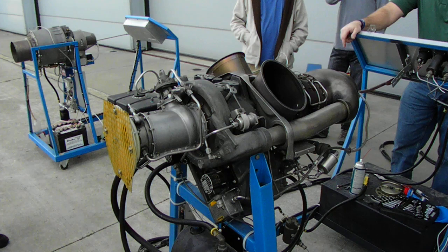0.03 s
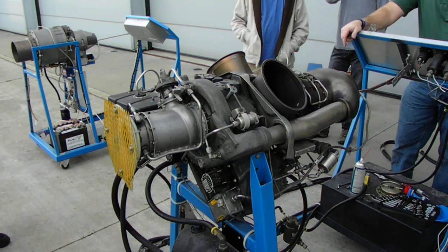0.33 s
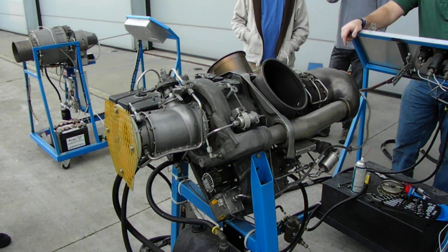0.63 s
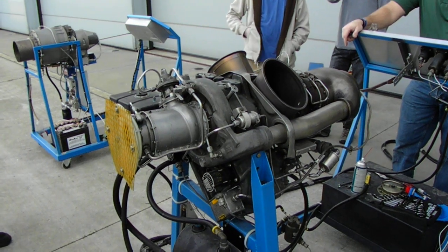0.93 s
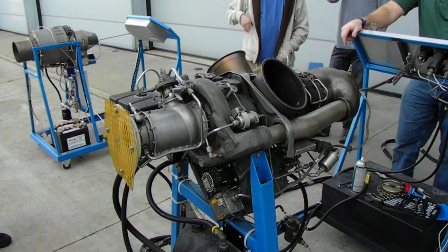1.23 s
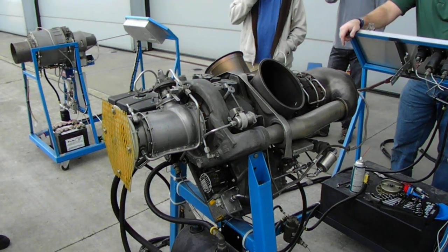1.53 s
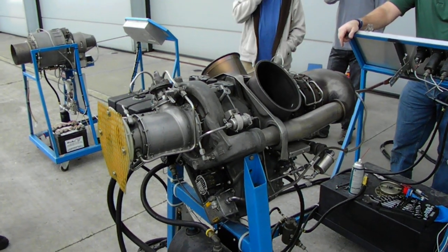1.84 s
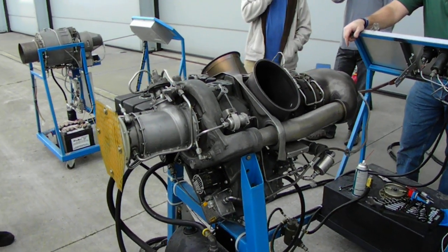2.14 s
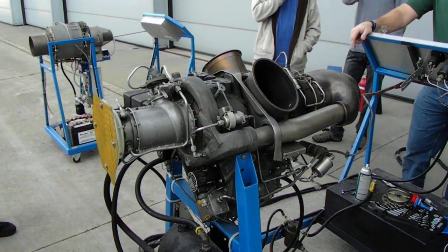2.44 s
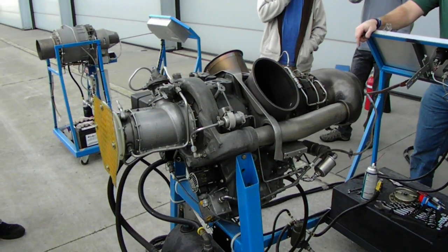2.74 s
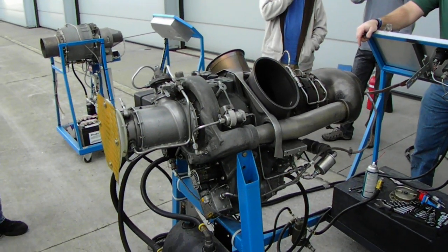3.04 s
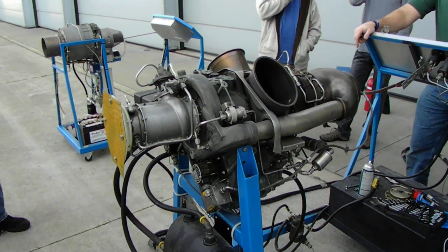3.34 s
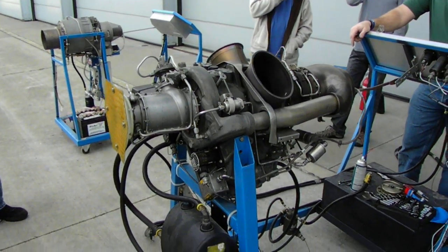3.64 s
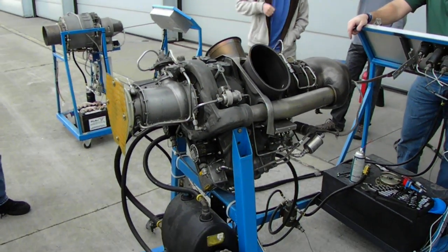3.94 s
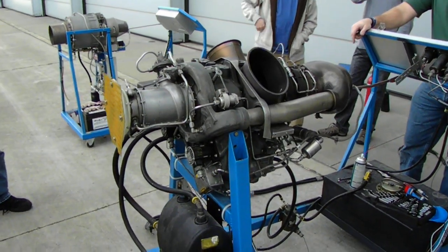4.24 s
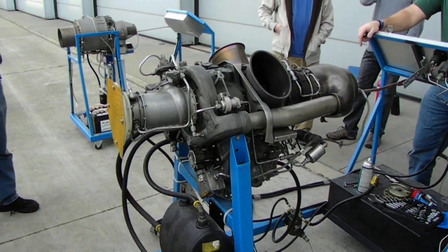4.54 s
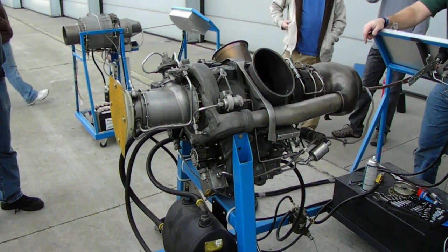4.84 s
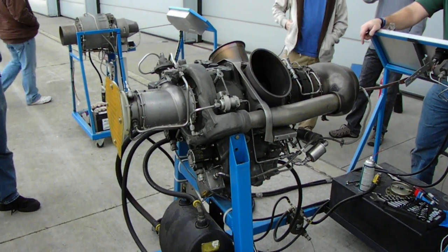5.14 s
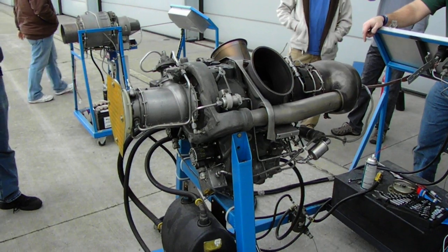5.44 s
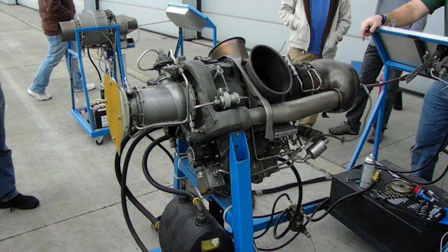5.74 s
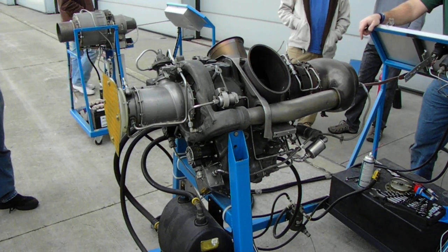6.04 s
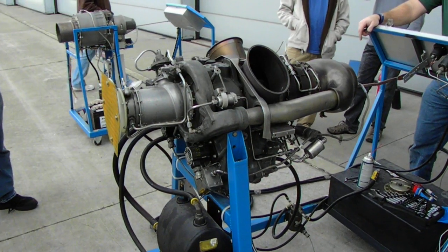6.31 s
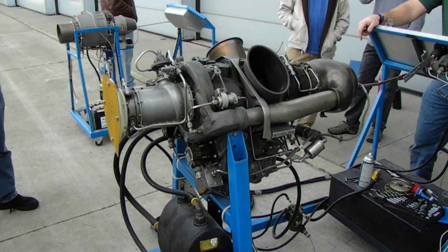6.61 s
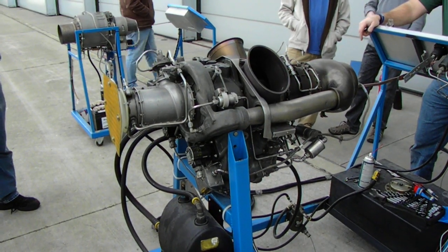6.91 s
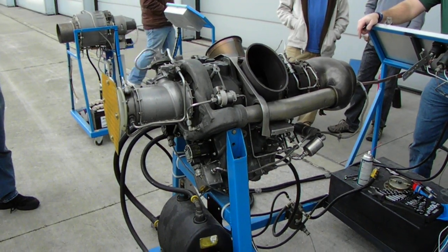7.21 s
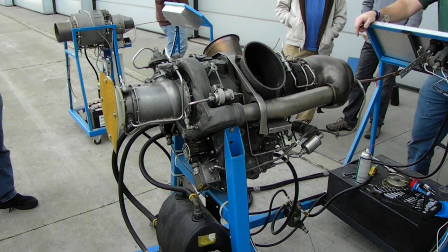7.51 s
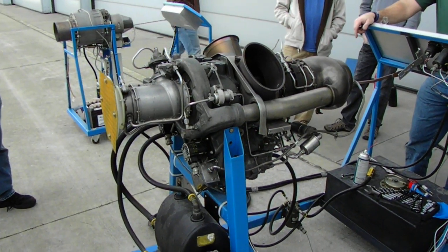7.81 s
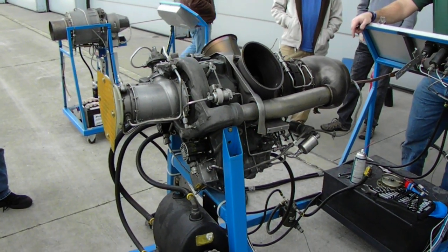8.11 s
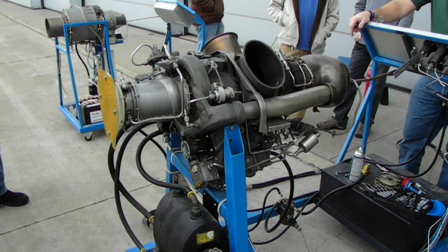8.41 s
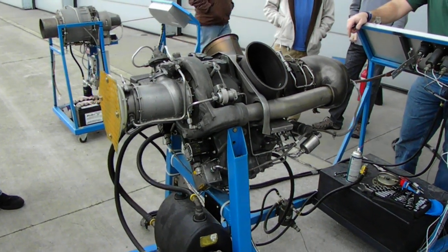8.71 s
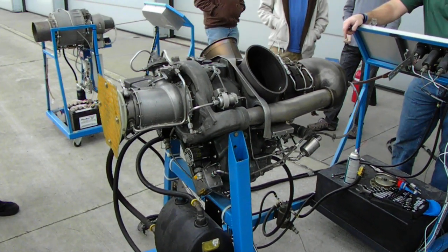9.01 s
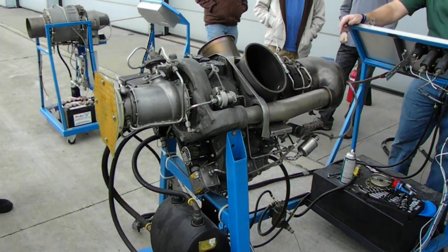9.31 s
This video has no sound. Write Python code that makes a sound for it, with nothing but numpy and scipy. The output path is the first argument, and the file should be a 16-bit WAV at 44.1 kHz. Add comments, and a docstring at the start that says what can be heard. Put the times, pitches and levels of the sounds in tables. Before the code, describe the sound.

Heard from close by in a large hall, a turbine engine on a test stand gives a shrill, steady whine over a strong hiss of air and a duller roar. Singing gears and a faint pump tone blend in, and the high tones shimmer as the microphone shifts. In the last second the power is cut: the gear tones weaken and the whine begins to sink in pitch, while the hiss continues.

```python
"""A small gas turbine on a test stand in a large hall, close to a hand-held microphone.
Its blades chop the air and whine on multiples of the rotor speed. A reduction gear sings and a pump
hums over intake hiss and exhaust roar. Near the end the fuel is cut: the pump's hum drops out,
the gears unload and all shaft tones glide down as drag slows the rotor."""
import sys
import numpy as np
from scipy import signal
from scipy.fft import rfft, irfft, next_fast_len
from scipy.io import wavfile

SR = 44100
rng = np.random.default_rng(int(sys.argv[2]) if len(sys.argv) > 2 else 0)


def materialize(psi):
    """Save the field psi as 16-bit PCM at rate SR to the path in sys.argv[1].

    A 1-D psi becomes a single channel; in a 2-D psi each row is a channel.
    """
    bounded = np.clip(np.atleast_2d(psi).T, -1, 1)
    quanta = np.round(bounded * 32767).astype(np.int16)
    wavfile.write(sys.argv[1], SR, quanta)


N = 412776

# governed rotor speed: time_s, speed_hz
GOVERNED_SPEED = [(0.1, 688.64), (0.8, 691.11), (1.39, 692.57), (1.99, 693.52), (2.74, 694.15),
                  (4.73, 694.67), (6.02, 694.55), (8.51, 693.27)]
# main blade tones as the microphone moves through standing waves: time_s, order_7_db, order_8_db
BLADE_LEVELS = [(0.12, -21, -23.2), (1.11, -22.5, -22.5), (1.36, -25.5, -20.5), (1.91, -26.7, -20.6),
                (2.4, -20, -24.5), (2.6, -22.9, -20.2), (2.85, -24.8, -24.8), (3.69, -23.4, -21.8),
                (4.14, -20.3, -27.5), (4.29, -21.4, -25.8), (4.73, -20, -27), (4.98, -20.6, -20.8),
                (5.82, -24.5, -23.6), (6.57, -24, -22.7), (6.76, -22.3, -22.9), (8.1, -21.5, -24.5),
                (8.35, -20.5, -33.8), (8.5, -20.6, -29.1)]
# the same tones, beating faster as they glide: time_s, order_7_db, order_8_db
BLADE_COAST_LEVELS = [(8.56, -21, -23.2), (8.62, -26, -28.8), (8.68, -23.7, -21.3), (8.92, -23.5, -32),
                      (9.0, -20.5, -26.3), (9.07, -26.5, -41), (9.1, -25.5, -29), (9.21, -20, -26.9),
                      (9.29, -27.5, -35.9), (9.35, -29, -42)]
# upper whine, relative levels: time_s, order_12_db, order_15_db
WHINE_LEVELS = [(0.12, -35.5, -29.5), (2.3, -28, -29), (2.5, -44, -26), (2.65, -33.0, -34),
                (2.85, -29.0, -28), (3.29, -27, -28.5), (3.99, -46, -28), (4.19, -40, -33.8),
                (4.33, -32.8, -26.5), (4.53, -39, -34), (5.38, -36.2, -29), (5.87, -28, -33),
                (6.57, -34.8, -30.3), (7.51, -38, -34), (8.35, -29.5, -34.5), (8.5, -33, -30)]
# rotor orders 16 and 19, relative level: time_s, level_db
SHRILL_LEVELS = [(0.12, -36), (6.57, -47.5), (7.46, -38.5), (7.9, -39), (8.5, -39)]
# weak rotor tones: order, powered_db, coasting_db
WEAK_ROTOR_TONES = [(5,-48,-48), (6,-44.5,-49), (9,-44.5,-44), (10,-40.5,-39), (11,-48,-51), (13,-46.5,-52),
                    (17,-50.5,-52), (18,-47,-48), (20,-47,-47), (22,-53,-55), (24,-48,-42), (25,-56,-49)]
# resonant bands added to the upper whine: centre_hz, width_hz, gain_db
RESONANCES = [(7330, 120, 12.5), (9250, 220, -3.5), (10050, 190, -2.5)]
# tooth meshes: time_s, order_16_db, order_17_db
MESH_LEVELS = [(0.12, -41.7, -33.5), (0.47, -44, -37.5), (1.11, -36, -33), (3.29, -35.5, -34.5),
               (3.73, -31, -41), (4.13, -30, -34), (5.66, -33.7, -31.0), (6.06, -32.5, -34),
               (7.74, -37.5, -35.5), (8.48, -35.5, -33.1)]
# other gear shaft tones: order, base_db
GEAR_TONES = [(2,-71), (4.22,-51), (6,-53.5), (6.92,-50.5), (9,-60), (11.06,-55), (15,-56), (18,-47.5),
              (19,-49), (22,-51), (25,-38.5), (26,-49.5), (29,-50), (30,-46), (31,-46), (34,-44), (35,-48),
              (38,-48), (39,-47), (41,-49), (47,-45), (49,-39), (50,-36), (51,-43), (55,-48), (59,-48),
              (66,-49), (75,-48), (78,-51), (85,-54)]
# swell of high gear tones and pump overtones: time_s, gain_db
SINGING_GAIN = [(0.2, -3), (2.1, -5), (2.6, 1.5), (3.8, 1.5), (4.8, 0), (6.2, 2), (7.7, -1), (8.45, -2.5)]
# pump overtones: harmonic, base_db
PUMP_OVERTONES = [(2,-49), (3,-39), (4,-44), (6,-36), (7,-44.5)]
# airflow, relative levels: time_s, roar_db, hiss_db
FLOW_LEVELS = [(0.1, -44, -31), (1.5, -43, -29), (2.3, -43.2, -29.5), (4.8, -41.5, -28.5),
               (7.9, -42.5, -29), (8.9, -42.1, -29.5), (9.36, -42.5, -29)]
# exhaust spectrum shape: frequency_hz, density_db
EXHAUST_SPECTRUM = [(25, -29), (60, -21), (110, -18.5), (185, -21.5), (260, -14), (340, -15), (420, -7),
                    (485, -11), (560, -3), (720, 1), (950, -2), (1300, 1.5), (2200, -0.5), (3200, -17)]
# intake spectrum shape: frequency_hz, density_db
INTAKE_SPECTRUM = [(1900, -28), (2400, -9.5), (2750, -3), (3100, -1.5), (3700, -2), (4050, -5),
                   (4700, -2.5), (5900, 0.5), (7000, 0.5), (8900, -2), (10200, -6.5), (11000, -9.5),
                   (13000, -14.5), (15600, -19)]
# faint creeping whistle: time_s, pitch_hz, level_db
WHISTLE_PATH = [(0.1, 1865, -48), (0.8, 1930, -49), (1.7, 1990, -52), (2.5, 2035, -60), (4.2, 2095, -57),
                (6.2, 2132, -49), (8.5, 2142, -50), (9.36, 2120, -58)]

START_S, FUEL_CUT_S = 0.1, 8.512
HALF_SPEED_S, WHINE_SHIFT_S = 5.98, 0.34  # counted from the fuel cut
GEAR_RATIO, PUMP_RATIO = 1 / 4, 85 / 48  # turns per rotor turn
GEAR_UNLOAD_DB, MESH_UNLOAD_DB = 8, 13
DIP_S, DIP_WIDTH_S, DIP_DB = 6.575, 0.015, 8.5
MIC_MOVE_S, MIC_MOVE_WIDTH_S = 3.6, 2
FLOOR_ECHO_S = 0.00462
NOTCH_HZ, NOTCH_WIDTH_HZ, CUTOFF_HZ = 7870, 1000, 15760
TIME_S = np.arange(N) / SR


def rotor_speed_hz():
    """Governed until the fuel cut, then slowed by square-law drag; slight wander throughout."""
    coasted_s = np.maximum(TIME_S - FUEL_CUT_S, 0)
    return curves(GOVERNED_SPEED)[0] / (1 + coasted_s / HALF_SPEED_S) + 0.024 * drift(9)


def blades(angle, powered):
    """Compressor and turbine blades chop the air; eddies make the high orders flutter most."""
    db_7, db_8 = curves(np.vstack([BLADE_LEVELS, BLADE_COAST_LEVELS]))
    db_12, db_15 = curves(WHINE_LEVELS)
    shrill_db, = curves(SHRILL_LEVELS)
    dip_db = DIP_DB * np.exp(-((TIME_S - DIP_S) / DIP_WIDTH_S) ** 2)
    main = (from_db(db_7 - dip_db) * tone(angle, order=7, scatter=0.05, scatter_hz=13)
            + from_db(db_8) * tone(angle, order=8, scatter=0.04, scatter_hz=12))
    upper = (
        whine(angle, order=12, db=db_12 + 2.5, sway_db=0.7, scatter=0.062, coast_db=0, echo=0.09)
        + whine(angle, order=14, db=-47.5, sway_db=3.5, scatter=0.57, coast_db=19.5, echo=0.39)
        + whine(angle, order=15, db=db_15 - 1, sway_db=1.24, scatter=0.068, coast_db=4, echo=0.11)
        + whine(angle, order=16, db=shrill_db + 2.1, sway_db=1.1, scatter=0.15, coast_db=2.5, echo=0.4)
        + whine(angle, order=19, db=shrill_db + 0.5, sway_db=1.8, scatter=0.12, coast_db=-1, echo=0.45)
        + whine(angle, order=21, db=-42, sway_db=1.5, scatter=0.15, coast_db=-5, echo=0.4))
    weak = sum(from_db(off_db + (on_db - off_db) * powered) * tone(angle, k, scatter=0.46, scatter_hz=3.7)
               for k, on_db, off_db in WEAK_ROTOR_TONES)
    return main + treble_notch(resonances(upper)) + weak


def whine(angle, order, db, sway_db, scatter, coast_db, echo):
    """High rotor order: sways most while the microphone moves, shifts by coast_db after the cut."""
    coasting = ramp(FUEL_CUT_S, WHINE_SHIFT_S)
    sway_scale = 0.55 + np.exp(-((TIME_S - MIC_MOVE_S) / MIC_MOVE_WIDTH_S) ** 2)
    level_db = db + coast_db * coasting + sway_db * sway_scale * drift(2.9)
    return from_db(level_db) * echo_beat(angle, order, echo) * tone(angle, order, scatter, scatter_hz=5.3)


def tone(angle, order, scatter, scatter_hz):
    """One shaft order: direct wave plus hall reflections of wandering strength and phase."""
    gliding = ramp(FUEL_CUT_S, 0.13)  # sweeping through hall modes adds fast flutter
    in_phase, quadrature = (scatter * (drift(scatter_hz) + gliding * drift(23)) for _ in range(2))
    phase = order * angle + rng.uniform(0, 2 * np.pi)
    wave = (1 + in_phase) * np.sin(phase) + quadrature * np.cos(phase)
    return wave * np.sqrt(2 / (1 + 2 * scatter ** 2))


def echo_beat(angle, order, echo):
    """Gain of a gliding tone beating against its floor reflection, faster at higher orders."""
    pitch_hz = order * np.gradient(angle) * SR / (2 * np.pi)
    fallen_hz = (pitch_hz[int(FUEL_CUT_S * SR)] - pitch_hz) * (TIME_S > FUEL_CUT_S)
    return np.abs(1 + echo * np.exp(2j * np.pi * fallen_hz * FLOOR_ECHO_S)) / (1 + echo)


def resonances(x):
    """Narrow resonances lift any tone passing through them."""
    return x + sum(from_db(gain_db) * signal.lfilter(*signal.iirpeak(hz, hz / width_hz, fs=SR), x)
                   for hz, width_hz, gain_db in RESONANCES)


def gearbox(shaft, powered, load_gain, singing_gain):
    """Tooth meshes with sidebands; the upper mesh and the lesser tones weaken without load."""
    db_16, db_17 = curves(MESH_LEVELS)
    lower_gain = from_db(db_16) * echo_beat(shaft, order=16, echo=0.25)
    upper_gain = from_db(db_17 - MESH_UNLOAD_DB * (1 - powered))
    mesh = (lower_gain * tone(shaft, order=16, scatter=0.092, scatter_hz=11)
            + upper_gain * tone(shaft, order=17, scatter=0.15, scatter_hz=21))
    low = sum(from_db(db) * tone(shaft, k, scatter=0.15, scatter_hz=7.9)
              for k, db in GEAR_TONES if k < 10)
    high = sum(from_db(db) * tone(shaft, k, scatter=0.26, scatter_hz=2.1)
               for k, db in GEAR_TONES if k >= 10)
    return mesh + load_gain * (low + singing_gain * high)


def pump(shaft, powered, overtone_gain):
    """Geared pump: the fundamental stops at the fuel cut and returns faintly while coasting."""
    overtones = sum(from_db(db) * tone(shaft, k, scatter=0.19, scatter_hz=3.3)
                    for k, db in PUMP_OVERTONES)
    hum = from_db(-36) * tone(shaft, order=1, scatter=0.099, scatter_hz=21)
    faint_hum = from_db(-49.5) * tone(shaft, order=1, scatter=0.11, scatter_hz=8)
    return powered * hum + ramp(8.9, 0.089) * faint_hum + overtone_gain * overtones


def tooth_errors(shaft):
    """Unequal teeth: a faint buzz, repeating every turn, on orders between gear and rotor tones."""
    taken = [k for k, _ in GEAR_TONES] + list(range(4, 91, 4))
    orders = np.setdiff1d(np.arange(21, 91), taken)
    level_db = -50 - 12 * orders / orders.max() + rng.normal(0, 2, len(orders))
    turn = np.linspace(0, 2 * np.pi, 2048)
    phases = np.outer(orders, turn) + rng.uniform(0, 2 * np.pi, (len(orders), 1))
    one_turn = np.sqrt(2) * from_db(level_db) @ np.sin(phases)
    return np.interp(shaft % (2 * np.pi), turn, one_turn)


def airflow():
    """Dull exhaust roar, bright intake hiss and a thin whistle."""
    roar_db, hiss_db = curves(FLOW_LEVELS)
    roar = from_db(roar_db + 2.5 + 0.5 * drift(27)) * turbulence(EXHAUST_SPECTRUM)
    hiss = from_db(hiss_db + 4 + 0.5 * drift(22)) * turbulence(INTAKE_SPECTRUM)
    whistle_hz, whistle_db = curves(WHISTLE_PATH)
    whistle = tone(2 * np.pi * np.cumsum(whistle_hz) / SR, order=1, scatter=0.33, scatter_hz=1.9)
    return roar + hiss + from_db(whistle_db) * whistle


def turbulence(spectrum):
    """Unit-rms noise coloured by a duct's spectrum."""
    hz, db = np.transpose(spectrum)
    size = next_fast_len(N)
    bins_hz = np.maximum(np.arange(size // 2 + 1) * SR / size, 1)
    shape = from_db(np.interp(np.log(bins_hz), np.log(hz), db))
    skirts = np.minimum(bins_hz / hz[0], 1) ** 2 * np.minimum(hz[-1] / bins_hz, 1) ** 2
    white = rfft(rng.standard_normal(size))
    return unit_rms(irfft(white * shape * skirts, size)[:N])


def treble_notch(x):
    """One narrow hollow in the treble."""
    notched = signal.lfilter(*signal.iirnotch(NOTCH_HZ, NOTCH_HZ / NOTCH_WIDTH_HZ, fs=SR), x)
    return notched + 0.054 * (x - notched)


def drift(corner_hz):
    """Unit-rms wander: noise through two one-pole low-passes."""
    hop, warm_up = 40, 2000
    pole = np.exp(-2 * np.pi * corner_hz * hop / SR)
    noise = rng.standard_normal(N // hop + warm_up + 2)
    slow = signal.lfilter([1], [1, -2 * pole, pole * pole], noise)[warm_up:]
    return np.interp(np.arange(N) / hop, np.arange(len(slow)), unit_rms(slow))


def curves(rows):
    """Interpolate a time table, one signal per value column."""
    time_s, *columns = np.transpose(rows)
    return [np.interp(TIME_S, time_s, column) for column in columns]


def ramp(start_s, length_s):
    return np.clip((TIME_S - start_s) / length_s, 0, 1)


def from_db(db):
    return 10 ** (np.asarray(db) / 20)


def unit_rms(x):
    return x / np.sqrt(np.mean(x ** 2) + 1e-20)


def scene():
    """One rotor angle drives blades, gears and pump over the airflow; both channels alike."""
    angle = 2 * np.pi * np.cumsum(rotor_speed_hz()) / SR
    gear_shaft, pump_shaft = angle * GEAR_RATIO, angle * PUMP_RATIO
    powered = np.clip((FUEL_CUT_S - TIME_S) / 0.015 + 0.5, 0, 1)
    load_gain = from_db(-GEAR_UNLOAD_DB * (1 - powered))
    singing_gain = from_db(curves(SINGING_GAIN)[0])
    rush = treble_notch(airflow() + tooth_errors(gear_shaft))
    engine = (blades(angle, powered)
              + gearbox(gear_shaft, powered, load_gain, singing_gain)
              + pump(pump_shaft, powered, load_gain * singing_gain)
              + rush)
    return np.stack([engine, engine])


def record(dry):
    """Abrupt start, steep low-pass."""
    low_pass = signal.ellip(14, 0.1, 70, CUTOFF_HZ, fs=SR, output="sos")
    return signal.sosfilt(low_pass, dry * (TIME_S >= START_S))


dry = scene()
out = record(dry)
materialize(out)
```